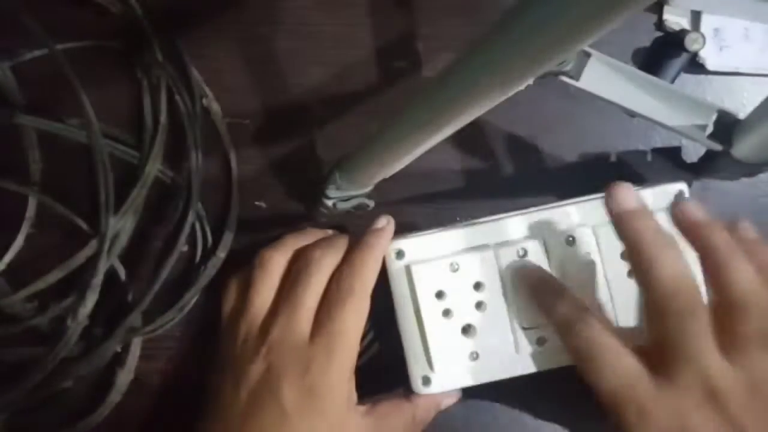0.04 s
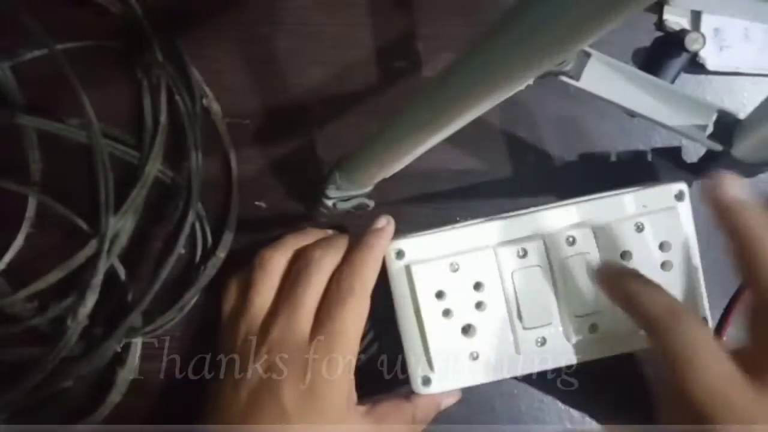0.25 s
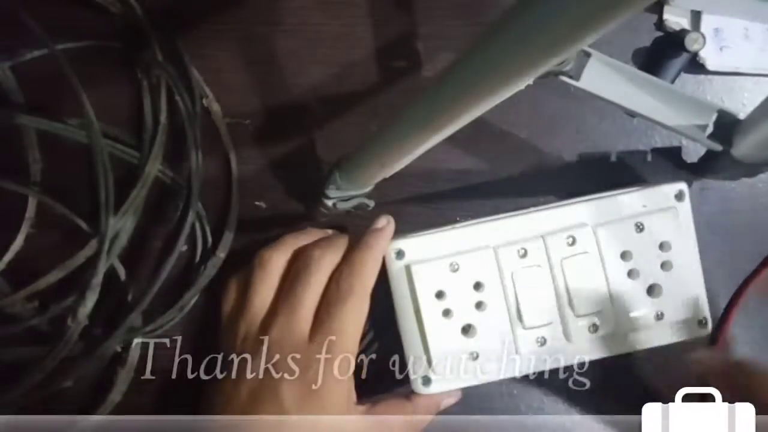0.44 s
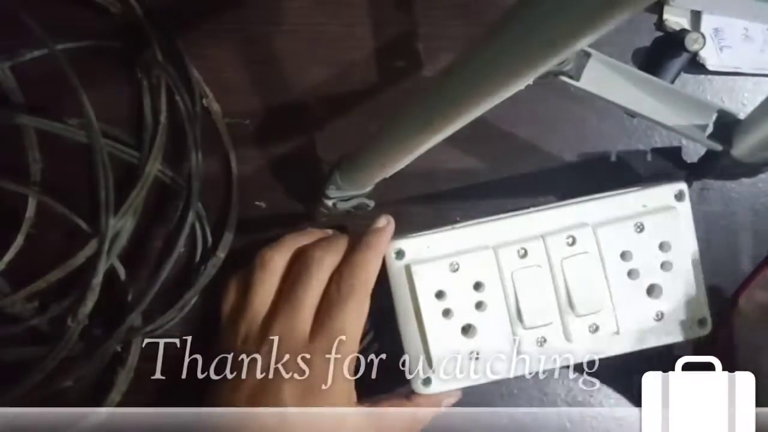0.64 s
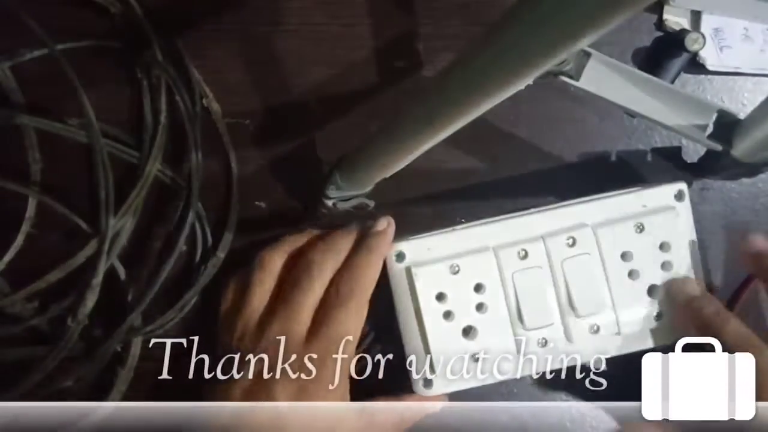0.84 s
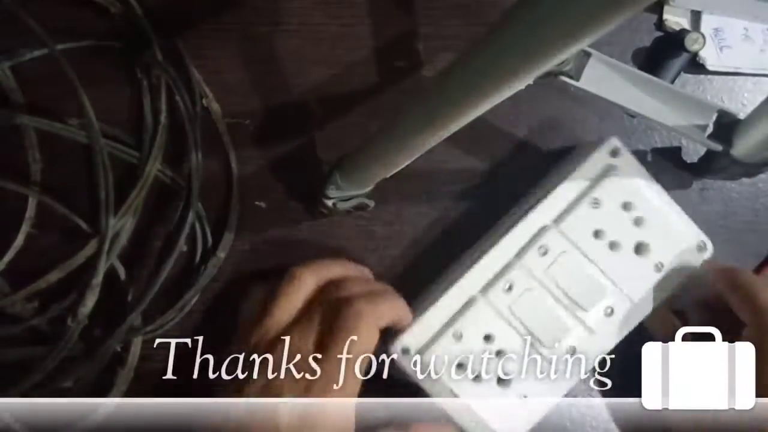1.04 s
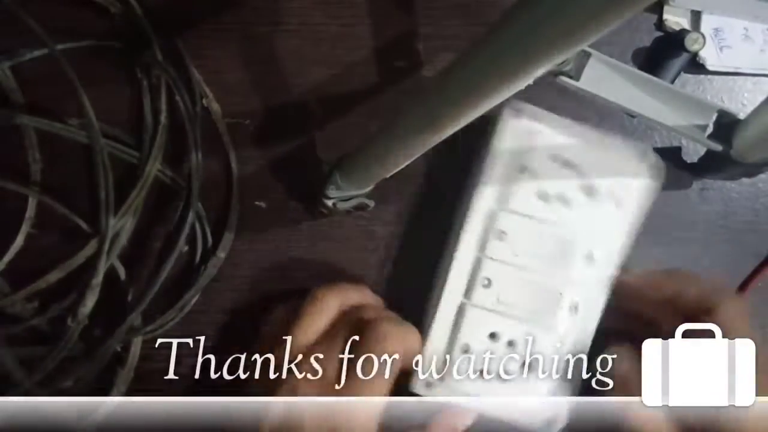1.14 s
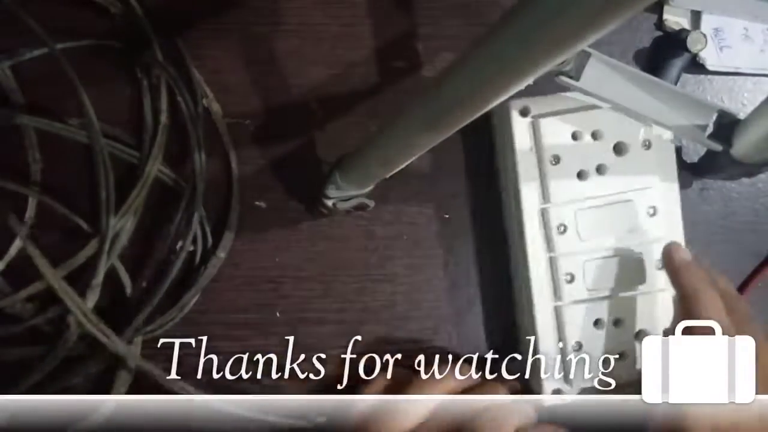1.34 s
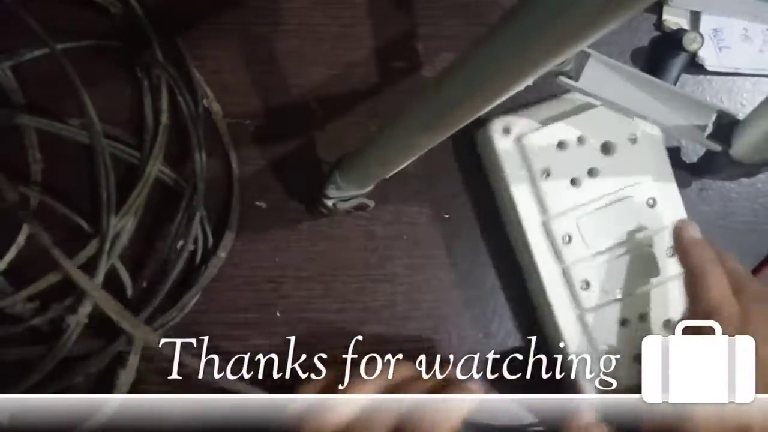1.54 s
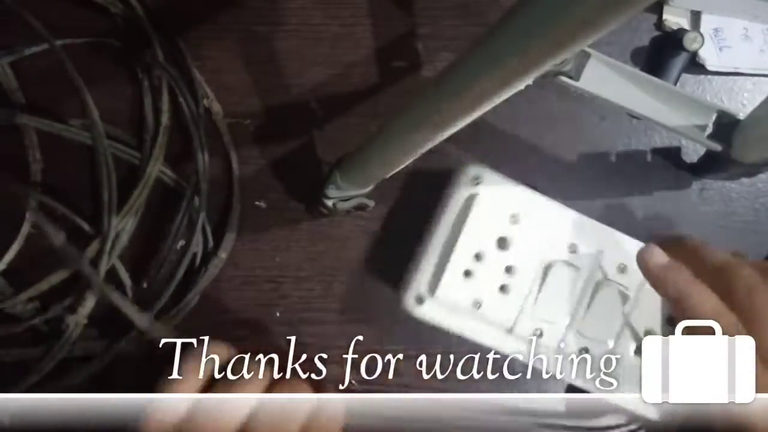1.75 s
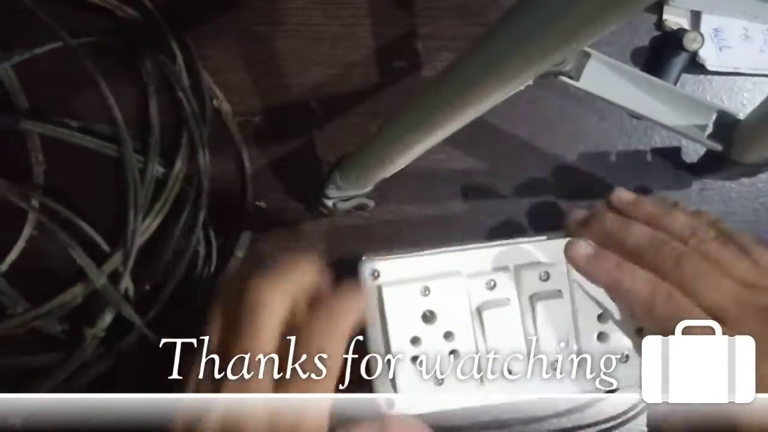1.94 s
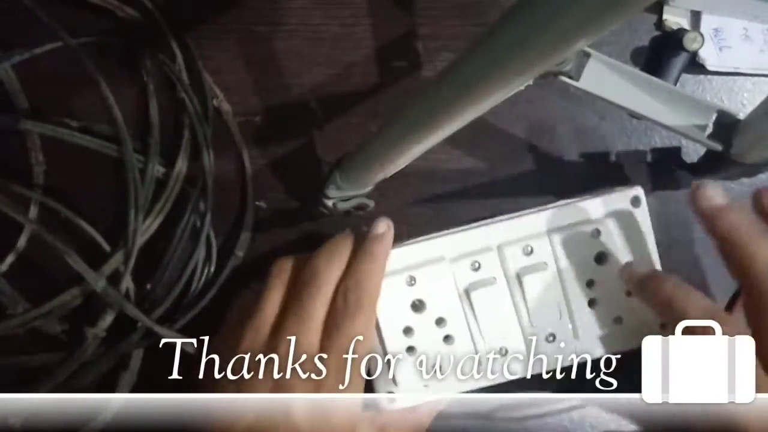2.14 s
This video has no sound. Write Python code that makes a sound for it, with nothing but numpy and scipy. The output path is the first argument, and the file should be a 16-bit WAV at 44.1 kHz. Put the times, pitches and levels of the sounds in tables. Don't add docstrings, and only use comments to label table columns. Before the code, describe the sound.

Plastic rocker switches click on a hollow switch box: a fading room tail of an earlier snap, then sharp snaps at 0.14 and 0.31 seconds, the second louder, with brief rattle and short room echo. High crickets trill steadily near 7 kHz over faint hum and air. From 0.9 seconds the box softly knocks, ticks and scrapes, busiest around 1.2-1.3 and 1.65-1.9; a lower cricket chirps from 1.6.

```python
import sys
import numpy as np
from scipy import signal
from scipy.fft import rfft, irfft
from scipy.io import wavfile
from scipy.ndimage import uniform_filter1d, minimum_filter1d

SR = 44100
rng = np.random.default_rng(int(sys.argv[2]) if len(sys.argv) > 2 else 0)


def field_ratio(decibels):
    return 10 ** (np.asarray(decibels, dtype=float) / 20)


def to_wav(s):
    ch = np.atleast_2d(s).T
    pcm = np.round(np.clip(ch, -1, 1) * 32767)
    wavfile.write(sys.argv[1], SR, pcm.astype(np.int16))


N = 97020


def noise(n):
    return rng.standard_normal(n)


def evened(x):
    return x / np.sqrt(np.mean(x ** 2) + 1e-20)


def read(points, hz):
    f, value = np.transpose(points)
    return np.interp(np.log(hz + 1), np.log(f + 1), value)


def colour(x, points):
    gain = field_ratio(read(points, np.fft.rfftfreq(len(x), 1 / SR)))
    return evened(irfft(rfft(x) * gain, len(x)))


def above(x, hz, order):
    return signal.sosfilt(signal.butter(order, hz, "high", fs=SR, output="sos"), x)


def eased(x, rise_s):
    rise = np.minimum(np.arange(len(x)) / SR / rise_s, 1)
    return x * np.sin(np.pi / 2 * rise) ** 2


def add(mix, s, sound):
    part = mix[max(round(s * SR), 0):][:len(sound)]
    part += sound[:len(part)]


def resonate(x, hz, width_hz):
    turn = np.exp(2j * np.pi * np.cumsum(hz * np.ones(len(x))) / SR)
    r = np.exp(-np.pi * width_hz / SR)
    return 2 * (turn * signal.lfilter([1 - r], [1, -r], x / turn)).real


def ring(modes):
    t = np.arange(SR // 8) / SR
    return sum(field_ratio(db - 60 * t / t60) * np.sin(2 * np.pi * hz * t) for hz, db, t60 in modes)


def burst(db, t60, points):
    t = np.arange(SR // 8) / SR
    return field_ratio(db - 60 * t / t60) * colour(noise(len(t)), points)


# (frequency [Hz], t60 [s])
ROOM_DECAY = [(600, 0.27), (2000, 0.18), (5000, 0.23), (12000, 0.18)]
ROOM_GAP_S = 0.0043


def room(x):
    hz, t, z = signal.stft(noise(SR // 2), SR, nperseg=128)
    decay = field_ratio(-60 * t / read(ROOM_DECAY, hz)[:, None])
    tail = signal.istft(z * decay, SR, nperseg=128)[1]
    tail = tail * np.clip(np.arange(len(tail)) / SR / ROOM_GAP_S - 1, 0, 1)
    return signal.fftconvolve(x, tail / np.linalg.norm(tail))[:len(x)]


# (frequency [Hz], level [dB per Hz])
HUM = [(20, -16.5), (60, -14.5), (120, -3.5), (170, -0.5), (240, -4.5), (330, -14), (600, -12.5),
       (900, -23)]
# (frequency [Hz], level [dB per Hz])
AIR = [(300, -3.5), (900, 0.5), (2200, -1), (3800, -5), (4600, -14.5), (6000, -15.5), (9000, -61)]
# (frequency [Hz], level [dB per Hz])
HISS = [(3000, -28), (6000, 5), (8500, 6), (10000, -1), (15500, -12)]
HUM_DB, AIR_DB, HISS_DB = -51, -58.5, -73.5


def night():
    hz, t, z = signal.stft(noise(N), SR, nperseg=512)
    patches = uniform_filter1d(noise(z.shape), size=4, axis=0)
    patches = evened(uniform_filter1d(patches, size=6, axis=1))
    air = signal.istft(z * field_ratio(0.82 * patches), SR, nperseg=512)[1][:N]
    hum = colour(noise(N), HUM + [(2500, -43.0)])
    hiss = colour(noise(N), HISS)
    return field_ratio(HUM_DB) * hum + field_ratio(AIR_DB) * colour(air, AIR) + field_ratio(HISS_DB) * hiss


def wing(t, hz, strokes_per_s, width_hz, glide, blur):
    u = (t * strokes_per_s + rng.random()) % 1
    wobble = evened(uniform_filter1d(noise(len(t)), size=300))
    pitch = hz * (1 + glide * (.5 - u) + 0.00653 * wobble)
    tone = np.sin(np.pi * u) * np.sin(2 * np.pi * np.cumsum(pitch) / SR)
    haze = noise(len(t))
    for widening in (1.33, 2, 3):
        haze = resonate(haze, hz, widening * width_hz)
    return evened(np.sqrt(1 - blur) * evened(tone) + np.sqrt(blur) * evened(haze))


UNEVEN_DB = 3.5


def throb(per_s, first, duty):
    turns = (np.arange(N) / SR - first) * per_s + 9
    strength = field_ratio(UNEVEN_DB * noise(99))[turns.astype(int)]
    return strength * np.sin(np.pi * np.clip(turns % 1 / duty, 0, 1) ** 0.18) ** 2


# (pitch [Hz], level [dB], duty [0-1])
CRICKETS = [
    (7550, -57, 1),
    (7310, -59.5, 1),
    (7112, -62, 1),
    (6830, -61.5, 1),
    (8090, -73, 1),
]
# (rate [chirps per s], first chirp [s])
CHIRP_TIMES = [(20.0, .0262), (20.0, .031), (18.4, .019), (23.0, 0.0), (5.77, .084)]
CHIRP_REST = (0.53, 0.39, 1, 0.79, 0.19)
STROKES_PER_S, GLIDE, WING_WIDTH_HZ, BLUR = 160, 0.049, 214, 0.87
# (time [s], length [s], level [dB])
LOW_CHIRPS = [
    (1.575, 0.025, -71),
    (1.604, 0.048, -63),
    (1.666, 0.041, -61),
    (1.714, 0.043, -62.5),
    (1.762, 0.024, -65),
    (1.8, .032, -63.5),
    (1.853, 0.054, -63),
]
LOW_HZ, LOW_STROKES_PER_S, LOW_WIDTH_HZ, LOW_GLIDE, LOW_BLUR = 5025, 76, 280, .035, .25
LOW_BETWEEN_DB = -71
# (frequency [Hz], level [dB])
BUZZ = [(8000, -22), (10000, 3), (11800, 9), (14000, 2), (15500, 6.5)]
BUZZ_DB, BUZZ_DUTY, BUZZ_PER_S, BUZZ_FIRST_S = -75, .6, 10.62, .032
TICKS_PER_S, TICK_S = 172.2, .0025


def crickets():
    t, out = np.arange(N) / SR, np.zeros(N)
    for k, (hz, db, duty) in enumerate(CRICKETS):
        strokes_per_s = STROKES_PER_S * (1 - 0.066 * k)
        width_hz = WING_WIDTH_HZ * (1 + 0.22 * k)
        song = wing(t, hz, strokes_per_s, width_hz, GLIDE, BLUR)
        strength = throb(*CHIRP_TIMES[k], duty) + CHIRP_REST[k]
        out += field_ratio(db) * evened(strength * song)

    low = wing(t, LOW_HZ, LOW_STROKES_PER_S, LOW_WIDTH_HZ, LOW_GLIDE, LOW_BLUR)
    out += field_ratio(LOW_BETWEEN_DB) * low * np.interp(t, [1.55, 1.62, 1.9, 1.95], [0, 1, 1, 0])
    for s, length, db in LOW_CHIRPS:
        u = np.arange(0, length, 1 / SR) / length
        swell = np.clip(8 * np.minimum(u, 1 - u), 0, 1)
        add(out, s, field_ratio(db) * swell * low[round(s * SR):][:len(u)])

    ticks = np.exp(-(t * TICKS_PER_S % 1) / TICKS_PER_S / TICK_S) * noise(N)
    turns = (t - BUZZ_FIRST_S) * BUZZ_PER_S % 1
    bursts = np.sin(np.pi * np.clip(turns / BUZZ_DUTY, 0, 1) ** 0.51)
    return out + field_ratio(BUZZ_DB) * colour(ticks * bursts, BUZZ)


# (time [s], level [dB], pitch [Hz], t60 [s])
KNOCKS = [(0.92, -39.5, 134, 0.079), (1.119, -47, 670, 0.079), (1.139, -39, 195, 0.066),
          (1.2095, -51, 5100, .01), (1.237, -36, 216, .04), (1.2445, -41, 2870, 0.016),
          (1.249, -61, 14500, .02), (1.259, -61, 10400, .05), (1.303, -45, 1850, .025),
          (1.33, -61, 14600, .015), (1.3301, -62, 10400, .015), (1.428, -58, 12000, .008),
          (1.4282, -43, 2150, 0.017), (1.4283, -40, 3600, .012), (1.4284, -47, 5900, .008),
          (1.481, -51, 2010, 0.04), (1.528, -45, 154, 0.071), (1.605, -52, 2260, 0.02),
          (1.659, -49, 1010, .04), (1.661, -49, 1990, 0.03), (1.662, -51, 3400, 0.033),
          (1.716, -46, 560, .06), (1.718, -43, 760, .05), (1.776, -40, 168, 0.14),
          (1.886, -41.5, 421, 0.15), (1.888, -43.5, 621, 0.1), (1.912, -41, 181, 0.07)]
# (time [s], level [dB])
TICKS = [(1.2095, -59), (1.235, -55), (1.2455, -49), (1.249, -51), (1.263, -49), (1.279, -55), (1.289, -54),
         (1.301, -53), (1.308, -45), (1.3305, -52), (1.4286, -44), (1.662, -56), (1.7232, -51),
         (1.8863, -53)]
# (frequency [Hz], level [dB])
TICK = [(1500, 1), (3500, 6), (6000, -11), (8500, -7), (11500, -9), (15500, -17)]
TICK_T60_S = 0.0069


def knocks():
    out = np.zeros(N)
    for s, db, hz, t60 in KNOCKS:
        modes = [(hz, db, t60), (hz * 1.14, db - 18, t60 * 0.38), (hz * 0.59, db - 12, t60 * 1.5)]
        add(out, s, eased(ring(modes), 1 / hz))
    for s, db in TICKS:
        add(out, s, burst(db, TICK_T60_S, TICK))
    return out


# (time [s], length [s], level [dB], hollow pitch [Hz], scuff level [dB])
SLIDES = [
    (1.052, 0.28, -59.5, 680, -61),
    (1.232, 0.11, -52, 632, -57),
    (1.646, 0.038, -54.5, 970, -59),
    (1.703, 0.039, -48.5, 765, -54),
    (1.725, 0.016, -63, 885, -55.5),
    (1.731, 0.056, -49, 685, -62),
    (1.734, 0.087, -62, 540, -71),
    (1.767, 0.11, -54.5, 790, -58),
    (1.887, 0.031, -51, 630, -53.5),
]
# (frequency [Hz], level [dB])
SCUFF = [(1000, 1.5), (2500, -4), (4000, -8), (8000, -13.5), (15000, -19.5)]
SLIPS_PER_S, SLIP_SPREAD_DB, GRIT = 1700, 2.5, 1.3
HOLLOW_WIDTH_HZ, TABLE_HZ, TABLE_DB = 186, 300, -4.5


def slides():
    out = np.zeros(N)
    strength = field_ratio(SLIP_SPREAD_DB * rng.exponential(1, N).clip(0, 2)) * noise(N)
    slips = strength * (rng.random(N) < SLIPS_PER_S / SR)
    scuff = colour(evened(slips) * GRIT + noise(N), SCUFF)
    for k, (s, length, db, hz, scuff_db) in enumerate(SLIDES):
        u, at = np.arange(0, length, 1 / SR) / length, round(s * SR)
        grit = slips[k * N // 12:][:len(u)]
        table = evened(resonate(resonate(grit, TABLE_HZ, 226), TABLE_HZ, 290))
        hollow = evened(resonate(resonate(grit, hz, HOLLOW_WIDTH_HZ), hz, 2 * HOLLOW_WIDTH_HZ))
        body = field_ratio(db) * (hollow + field_ratio(TABLE_DB) * table)
        swell = np.sin(np.pi * u ** 0.51) ** 0.68
        add(out, s, swell * (body + field_ratio(scuff_db) * scuff[at:at + len(u)]))
    return out


def handling():
    out = above(knocks() + slides(), 75, order=2)
    return out + field_ratio(-10.5) * room(out)


SNAP_S = (.13798, .3062)
# (level [dB], sharp tick level [dB], room send [dB])
SNAPS = [
    (-11.5, -21, 0.5),
    (-7.5, -33, -6.5),
]
# (frequency [Hz], level [dB])
ROCKER_A = [(1600, -23), (1935, 3), (2200, 0), (2780, 10), (3380, 4.5), (3900, -27), (4400, -38), (6000, 2),
            (6950, 2.5), (8000, -0.5), (9500, -5)]
# (frequency [Hz], level [dB])
ROCKER_B = [(1330, -9), (1857, 8.5), (2500, 3), (2795, -7), (3350, 1.5), (4060, -6), (5150, -14),
            (5730, -23), (6730, 5), (7660, -10), (9170, -19)]
ROCKER_T60_S = (.007, .009)
# (frequency [Hz], level [dB], t60 [s])
BOX_A = [(1005, -4.5, 0.065), (1050, -10, 0.046), (2150, -12, 0.049)]
# (frequency [Hz], level [dB], t60 [s])
BOX_B = [(630, -14.5, 0.11), (817, -11, 0.038), (1010, 2, 0.015), (1800, 5.5, 0.0095)]
# (frequency [Hz], level [dB], t60 [s])
PUNCH = [(2350, 15, .005), (2250, 15, .0055)]
# (delay [s], level [dB])
RATTLE_A = [(-.0017, -20), (.001, -9), (.005, -22), (.0135, -22), (.0152, -21), (.021, -25), (.034, -27)]
# (delay [s], level [dB])
RATTLE_B = [(-.0004, -24), (.0011, -10), (.0021, -9), (.007, -24)]
# (frequency [Hz], level [dB])
CRACK = [(400, -1.5), (1000, 10), (2200, -3), (3800, 4), (4800, -19), (6500, 4.5), (10000, -17),
         (15300, -17)]
# (crack level [dB], chatter level [dB], chatter t60 [s])
CHATTER = [(-23, -21, 0.081), (-8, -23, 0.066)]
# (frequency [Hz], level [dB], t60 [s])
SNAP_TICK = [(10800, 0, 0.004), (12900, -4, 0.004), (15300, -4, 0.006)]
SNAP_RISE_S, CRACK_T60_S, CHATTER_RISE_S = .0002, .008, .003
ROCKER_LOW_HZ, BOX_LOW_HZ = 1300, 560
ROOM_DB, EARLIER_DB, EARLIER_S = -15.5, -11.5, 0.024


def switches():
    lead = SR // 10
    out, sent = np.zeros((2, N + lead))
    parts = zip(SNAP_S, SNAPS, (ROCKER_A, ROCKER_B), ROCKER_T60_S, (BOX_A, BOX_B),
                (RATTLE_A, RATTLE_B), CHATTER, PUNCH)
    for s, levels, modes, t60, box, rattle, loose, punch in parts:
        db, tick_db, room_db = levels
        crack_db, chatter_db, chatter_t60 = loose
        rocker = above(ring([(hz, mode_db, t60) for hz, mode_db in modes]), ROCKER_LOW_HZ, order=2)
        blow = eased(-rocker - ring(box + [punch]), SNAP_RISE_S)
        crack = eased(burst(crack_db, CRACK_T60_S, CRACK), SNAP_RISE_S)
        blow = blow / abs(blow).max() + crack

        snap = np.zeros(N + lead)
        for delay, rattle_db in [(0.0001, 0.013)] + rattle:
            add(snap, lead / SR + s + delay, field_ratio(db + rattle_db) * blow)
        chatter = eased(burst(chatter_db, chatter_t60, CRACK), CHATTER_RISE_S)
        tick = field_ratio(tick_db) * eased(ring(SNAP_TICK), 2 * SNAP_RISE_S)
        add(snap, lead / SR + s, field_ratio(db) * (chatter - tick))
        out += snap
        sent += field_ratio(room_db) * snap
    add(sent, lead / SR - EARLIER_S, field_ratio(EARLIER_DB) * blow)
    return above(out + field_ratio(ROOM_DB) * room(sent), BOX_LOW_HZ, order=3)[lead:]


def scene():
    return (night() + crickets() + handling() + switches())[None]


def top_cut(x):
    return signal.sosfilt(signal.butter(12, 16630, fs=SR, output="sos"), x)


DUCK_FROM_DB, DUCK_SHARE, RECOVER_DB_PER_S, LOOK_AHEAD_S = -33.5, 0.33, 592, .018
START_DUCK_DB, START_RECOVER_S = 4.5, 0.099
EDGE_HZ = 15480


def record(dry):
    power_db = 10 * np.log10(abs(uniform_filter1d(dry[0] ** 2, size=100)) + 1e-12)
    ahead = round(LOOK_AHEAD_S * SR)
    early_db = -minimum_filter1d(-power_db, size=ahead, origin=-(ahead // 2))
    fall = np.arange(N) * RECOVER_DB_PER_S / SR
    held_db = np.maximum.accumulate(early_db + fall) - fall
    over_db = np.maximum(held_db - DUCK_FROM_DB, 0)
    start_db = START_DUCK_DB * np.exp(-(np.arange(N) / SR / START_RECOVER_S) ** 2)
    ducked = dry / field_ratio(DUCK_SHARE * uniform_filter1d(over_db, size=300) + start_db)
    limited = signal.oaconvolve(ducked, signal.firwin(801, EDGE_HZ, fs=SR)[None], "same")
    return top_cut(limited)


dry = scene()
out = record(dry)
to_wav(out)
```